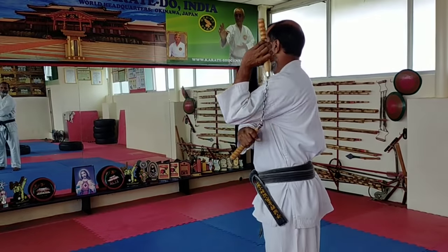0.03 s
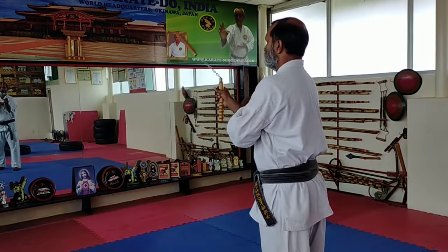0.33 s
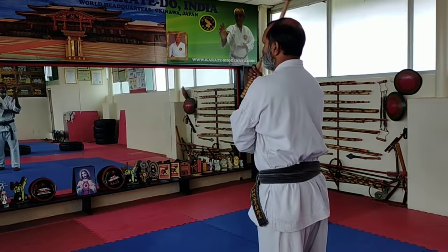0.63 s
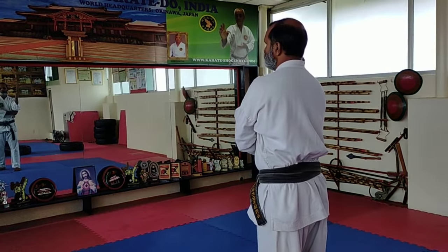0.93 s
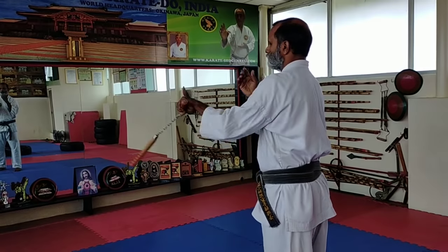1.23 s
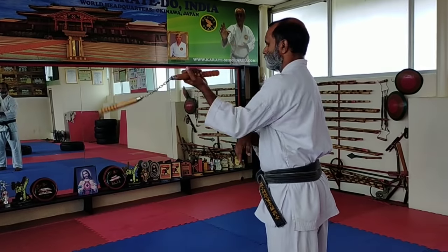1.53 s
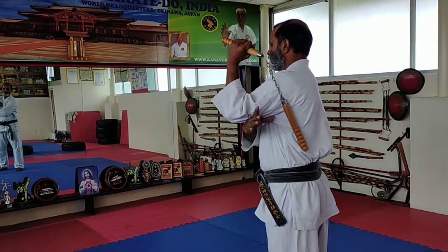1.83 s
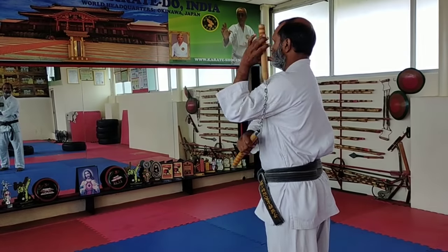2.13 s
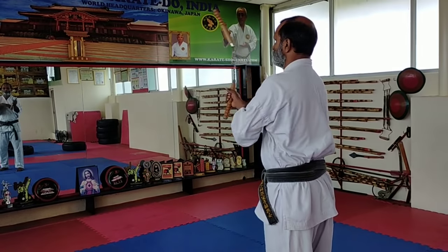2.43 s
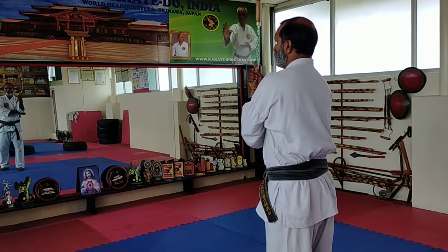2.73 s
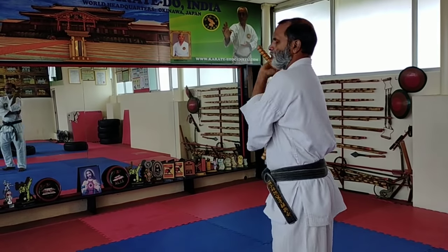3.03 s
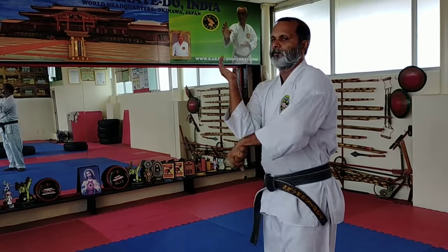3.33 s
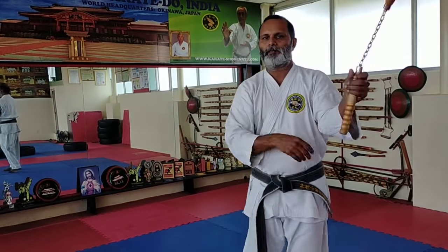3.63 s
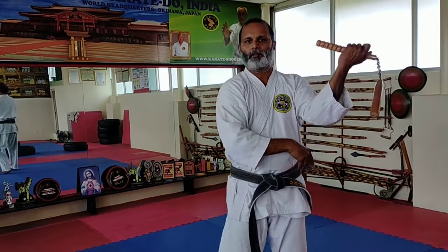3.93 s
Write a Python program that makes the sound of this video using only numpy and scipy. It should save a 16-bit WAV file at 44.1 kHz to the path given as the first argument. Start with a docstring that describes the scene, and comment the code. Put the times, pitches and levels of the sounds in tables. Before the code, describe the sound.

A nunchaku chain clinks and rattles as sticks knock and cotton rustles in an echoing hall.

```python
"""Nunchaku swung and caught in a large training hall, a couple of metres from a phone.
From the start a heavy cotton jacket rustles and flaps with the arm strokes, chain links shuffle, clink
and squeak under load, and the wooden sticks knock. At 1.9 s a stick slaps home amid the loudest clinks.
The chain settles near 3 s, then picks up again. The hall rings after everything, over a faint hiss."""
import sys
import numpy as np
from scipy import signal
from scipy.fft import rfft, irfft
from scipy.io import wavfile
from scipy.ndimage import uniform_filter1d

SR = 44100
rng = np.random.default_rng(int(sys.argv[2]) if len(sys.argv) > 2 else 0)


def waveform_to_disk(signal):
    """Save audio, clipped to [-1, 1], as 16-bit WAV at the path in sys.argv[1]."""
    frames = np.transpose(np.atleast_2d(signal))
    scaled = np.clip(frames, -1, 1) * 32767
    samples = np.round(scaled).astype(np.int16)
    wavfile.write(sys.argv[1], SR, samples)


N = 176400
TICK_DECAY_S = 0.0016
# rubbing cotton spectrum: f/Hz, level/dB
CLOTH_SPECTRUM = [(100, -9.5), (600, -12.5), (1100, -1.5), (2200, 0), (3400, 0.5), (5000, -15.5),
                  (16000, -18)]


def chain():
    """Links clink and shuffle; each contact ticks and rings briefly at its own link's pitch."""
    # link strikes: t/s, level/dB
    clinks = [(.143, -33), (0.2215, -31), (0.2967, -28.5), (1.2553, -29), (1.27, -25.5), (1.336, -32),
              (1.397, -21.5), (1.57, -31.5), (1.756, -25.5), (1.913, -18.5), (1.983, -21.5), (2.02, -25.5),
              (2.269, -26.5), (2.422, -26), (2.537, -27), (2.56, -28), (3.28, -34.5), (3.512, -26.5),
              (3.572, -32.5), (3.6406, -32.5), (3.919, -30), (3.967, -22.5)]
    # shuffle of the swinging chain: t/s, level/dB
    shuffle_levels = [(0, -49), (.55, -48), (.72, -51.5), (1.152, -51.5), (1.35, -44.5), (2.33, -47),
                      (2.43, -40.5), (2.6, -46), (2.95, -62.5), (3.38, -56.5), (3.499, -48), (4, -51)]
    # contact spectrum: f/Hz, level/dB
    contact_spectrum = [(800, -34), (4500, -9), (9000, 0), (15500, 3)]
    force = sum(tumble(start_s, db) for start_s, db in clinks)
    tick_gain = signal.lfilter([1], [1, -np.exp(-1 / (TICK_DECAY_S * SR))], force)
    ticks = tick_gain * rng.standard_normal(N)
    shuffle_gain = amp(np.interp(np.arange(N) / SR, *np.array(shuffle_levels).T))
    contacts = colour(ticks + shuffle_gain * grains(450, spread_db=3), contact_spectrum)
    return placed(amp(-2.5) * (contacts + amp(-6) * link_ring(contacts)), hall_db=-4)


def tumble(start_s, db, count=4, gap_s=0.0036, loss_db=4.5):
    """Force of one link striking another and bouncing at uneven gaps, weaker each time."""
    gaps_s = gap_s * (.5 + rng.random(count))
    times_s = start_s + np.cumsum(gaps_s) - gaps_s[0]
    force = np.zeros(N)
    for k, time_s in enumerate(times_s):
        force[min(int(time_s * SR), N - 1)] += amp(db - k * loss_db)
    return force


def link_ring(contacts, count=6, pitch_spread=.12, t60_s=0.0064, turn_s=.008):
    """Contacts pass from link to link at random; each link rings a little higher or lower."""
    # steel link modes: f/Hz, level/dB
    modes = [(5900, -3.5), (8500, -4.5), (11600, -4.5)]
    t, hold = np.arange(SR // 10) / SR, int(turn_s * SR)
    struck = np.repeat(rng.integers(0, count, N // hold + 1), hold)[:N]
    out = 0
    for k, detune in enumerate(1 + pitch_spread * np.linspace(-1, 1, count)):
        ring = sum(amp(db - 60 * t / t60_s) * np.sin(2 * np.pi * detune * hz * t) for hz, db in modes)
        out = out + signal.fftconvolve(contacts * (struck == k), ring / np.linalg.norm(ring))[:N]
    return out


def slap(start_s=1.9005):
    """A stick is stopped by hand and body: one dull pulse and a short scatter."""
    # impact spectrum: f/Hz, level/dB
    spectrum = [(80, -4.5), (650, 2), (900, -0.5), (1500, -7), (8000, -32)]
    scatter_gain = amp(-41) * envelope(start_s, attack_s=0.0018, length_s=0.0044, decay_s=0.013)
    force = scatter_gain * rng.standard_normal(N)
    force[int(start_s * SR)] += amp(-10)
    return placed(colour(force, spectrum), hall_db=0.5)


def jacket(attack_s=0.004):
    """Cotton rubs in dense grains, each stroke with its own fold resonance; loose cloth flaps lower."""
    # sleeve strokes: t/s, length/s, level/dB, fold f/Hz
    strokes = [(.005, 0.03, -44.5, 3200), (0.217, 0.0069, -43.5, 2690), (0.326, 0.055, -45.5, 2100),
               (0.506, 0.061, -46, 3420), (0.758, 0.026, -46.5, 2930), (0.85, 0.046, -45, 2780),
               (0.968, 0.036, -47.5, 3200), (1.173, 0.06, -47, 3180), (1.252, 0.16, -47.5, 2600),
               (1.454, 0.062, -44, 2350), (1.623, 0.19, -52, 2920), (1.891, 0.094, -42, 2200),
               (2.316, 0.27, -47.5, 1300), (2.7, 0.1, -51.5, 1970), (3.009, 0.066, -47.5, 2430),
               (3.29, 0.018, -51, 3130), (3.5, 0.079, -49, 2180), (3.854, 0.042, -44.5, 3040)]
    # scraping fibre spectrum: f/Hz, level/dB
    fibre_spectrum = [(1000, -19.5), (5000, 6.5), (16000, 0)]
    # loose cloth flaps: t/s, level/dB
    flaps = [(0.766, -52), (0.84, -52.5), (2.45, -53), (2.55, -52), (2.988, -51.5)]
    # flap spectrum: f/Hz, level/dB
    flap_spectrum = [(60, -11.5), (480, -10), (800, 1.5), (2500, -31.5)]
    catch = amp(2.7 * walk(81) - 5.0)
    coarse = colour(catch * grains(7000, spread_db=5.5), CLOTH_SPECTRUM)
    fine = colour(catch * grains(6000, spread_db=4.5), fibre_spectrum)
    rub = 0
    for start_s, length_s, db, hz in strokes:
        fold = signal.lfilter(*signal.iirpeak(hz, Q=3.3, fs=SR), coarse)
        cloth = coarse + amp(-7) * fold + amp(0.5) * fine
        rub = rub + amp(db) * envelope(start_s, attack_s, length_s, decay_s=0.031) * cloth
    flap_gain = sum(amp(db) * envelope(start_s, attack_s, 0, decay_s=0.046) for start_s, db in flaps)
    flapping = colour(flap_gain * grains(2500, spread_db=3), flap_spectrum)
    return placed(rub, hall_db=1) + placed(flapping, hall_db=-2)


def squeaks(pitch_sag=0.027):
    """Stick-slip between loaded steel links: brief unsteady whistles with an octave overtone."""
    # link slips: t/s, length/s, f/Hz, level/dB, hall send/dB, relative pitch wobble
    slips = [(0.239, .007, 9340, -40.5, -4.5, .03), (1.391, 0.01, 8080, -29.5, 1.5, 0.062),
             (2.17, 0.0091, 4803, -46, 8, 0.046), (2.385, 0.043, 8320, -44, -0.5, 0.085),
             (3.415, 0.013, 7780, -37.5, -3.5, 0.046), (3.428, 0.0044, 8160, -28.5, -17, .012),
             (3.516, 0.0044, 3920, -35.5, 0, 0.057), (3.724, 0.011, 7580, -43, 4.5, 0.06),
             (3.899, 0.023, 9460, -41.5, -8, 0.012)]
    out, t = np.zeros((2, N)), np.arange(N) / SR
    wander, grip = walk(2200), amp(3.1 * walk(780))
    for start_s, length_s, hz, db, hall_db, wobble in slips:
        on = (t >= start_s) & (t < start_s + length_s)
        progress = (t[on] - start_s) / length_s
        pitch_hz = hz * (1 - pitch_sag * (progress - .5)) * (1 + wobble * wander[on])
        phase = 2 * np.pi * np.cumsum(pitch_hz) / SR
        tone = np.sin(phase) + amp(-7) * np.sin(2 * phase)
        arch = np.sqrt(2 * np.abs(np.sin(np.pi * progress)))
        out[:, on] += placed(amp(db) * arch * grip[on] * tone, hall_db)
    return out


def knocks():
    """A stick chatters against the chain, ringing one note of the wood set by where it is gripped."""
    # runs of contacts: t/s, length/s, wood f/Hz, level/dB
    rattles = [(0.34, 0.019, 2220, -49.5), (0.53, .04, 3550, -53), (1.983, 0.0061, 3400, -39),
               (2.02, 0.0057, 3700, -40.5), (2.211, 0.0087, 3350, -42.5), (2.236, .032, 2104, -47.5),
               (2.426, 0.047, 3040, -50.5), (3.688, .006, 2980, -44), (3.862, 0.031, 2950, -47)]
    out = 0
    for start_s, length_s, hz, db in rattles:
        gate = envelope(start_s, TICK_DECAY_S / 2, length_s, TICK_DECAY_S)
        contacts = gate * grains(1500, spread_db=2)
        ring = signal.lfilter(*signal.iirpeak(hz, Q=16, fs=SR), contacts)
        knock = ring / np.linalg.norm(ring) + amp(-6) * contacts / np.linalg.norm(contacts)
        out = out + amp(db) * np.sqrt(length_s * SR) * knock
    return placed(out, hall_db=-1)


def hall(x, delay_s=0.0027, build_s=0.0057):
    """Diffuse reverberation, building up after a short gap; the treble dies first."""
    # reverberation time: f/Hz, T60/s
    t60_curve = [(100, 1.1), (3000, 1.5), (15000, 0.17)]
    t, hz = np.arange(N) / SR, np.linspace(0, SR / 2, N // 2 + 1)
    noise, tail = rfft(rng.standard_normal(N)), 0
    onset = np.clip((t - delay_s) / build_s, 0, 1)
    edges_hz = [0, 300, 1000, 2000, 4000, 7000, 10000, 13000, SR]
    for lo, hi in zip(edges_hz, edges_hz[1:]):
        centre_hz = (lo + min(hi, 15750)) / 2
        decay = onset * amp(-60 * t / along(t60_curve, centre_hz))
        band = irfft(noise * ((hz >= lo) & (hz < hi)), N)
        tail = tail + band * decay / np.linalg.norm(decay)
    return signal.fftconvolve(x, tail)[:N]


def background():
    """Steady hiss and rumble; at first the hall still rings from an earlier swing."""
    # noise floor spectrum: f/Hz, level/dB
    hiss_spectrum = [(22, 2.5), (38, 8.5), (70, 0), (600, -6), (16000, -14.5)]
    fade = amp(-52) * envelope(0, 1 / SR, 0, decay_s=0.66)
    ringing = fade * colour(rng.standard_normal(N), CLOTH_SPECTRUM)
    return amp(-56.5) * colour(rng.standard_normal(N), hiss_spectrum) + ringing


def amp(db):
    """Decibels to gain."""
    return 10 ** (np.asarray(db) / 20)


def along(points, hz):
    """Interpolate (f/Hz, value) points over log frequency."""
    points_hz, values = np.array(points, float).T
    return np.interp(np.log(np.maximum(hz, 1)), np.log(points_hz), values)


def colour(x, spectrum, size=4096):
    """Minimum-phase filter with the given spectrum and unit mean power gain."""
    gain = amp(along(spectrum, np.linspace(0, SR / 2, size // 2 + 1)))
    cepstrum = irfft(np.log(gain / np.sqrt(np.mean(gain ** 2))))
    cepstrum[1:size // 2] *= 2
    cepstrum[size // 2 + 1:] = 0
    return signal.fftconvolve(x, irfft(np.exp(rfft(cepstrum))))[:N]


def walk(rate_hz):
    """Smooth random drift, standard deviation 1."""
    width = max(int(SR / rate_hz), 1)
    drift = uniform_filter1d(uniform_filter1d(rng.standard_normal(N), width), width)
    return drift / drift.std()


def grains(rate_per_s, spread_db):
    """Random tiny contacts of uneven size, rms 1."""
    hits = (rng.random(N) < rate_per_s / SR) * np.sign(rng.standard_normal(N))
    pulses = hits * amp(spread_db * np.minimum(rng.standard_normal(N), 2))
    return pulses / pulses.std()


def envelope(start_s, attack_s, length_s, decay_s):
    """Linear rise; exponential decay once the length is over."""
    t = np.arange(N) / SR - start_s
    return np.clip(t / attack_s, 0, 1) * np.exp(-np.clip((t - length_s) / decay_s, 0, 60))


def placed(x, hall_db):
    """Two rows: direct sound, hall send."""
    return np.array([x, x * amp(hall_db)])


def scene(swings_per_s=2.01):
    """Jacket, chain and sticks, direct and through the hall; their motion shifts the hall paths."""
    direct, send = jacket() + chain() + knocks() + squeaks() + slap()
    angle_rad = np.pi * swings_per_s * np.arange(N) / SR  # half a turn per swing
    reverb = hall(send * np.cos(angle_rad)) + hall(send * np.sin(angle_rad))
    return (direct + reverb + background())[None]


def record(dry, cutoff_hz=15750):
    """The phone's microphone port colours the sound, and the top is cut."""
    # microphone port response: f/Hz, level/dB
    port_response = [(1110, -1), (1240, 7.5), (1430, -.5), (3100, 2.5), (4200, -3.5), (8200, 2),
                     (10000, -1.5), (13000, 0), (15400, 7.5)]
    heard = amp(3) * colour(dry[0], port_response)
    lowpass = signal.ellip(12, .2, 80, cutoff_hz, fs=SR, output="sos")
    return signal.sosfilt(lowpass, heard)[None]


dry = scene()
out = record(dry)
waveform_to_disk(out)
```